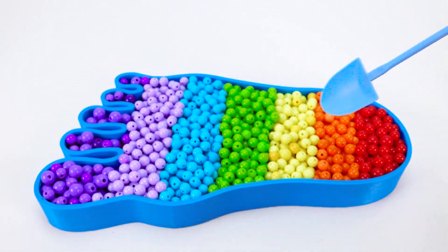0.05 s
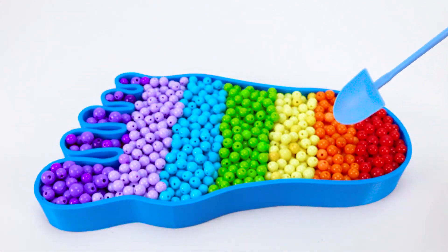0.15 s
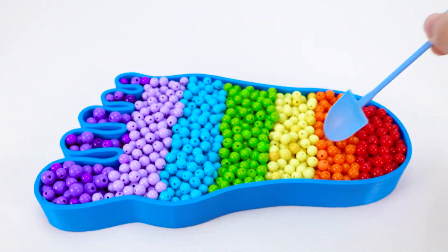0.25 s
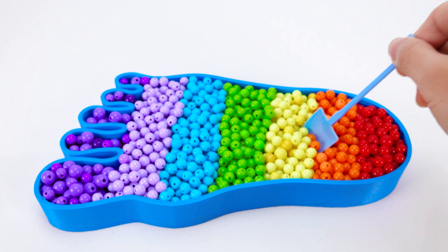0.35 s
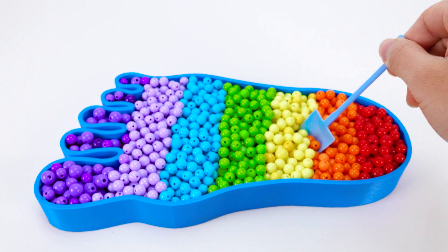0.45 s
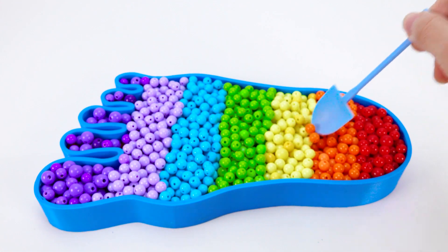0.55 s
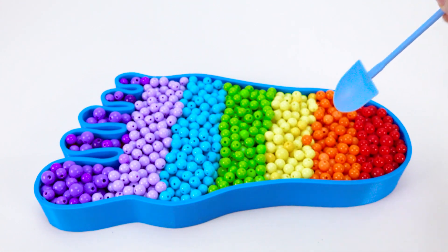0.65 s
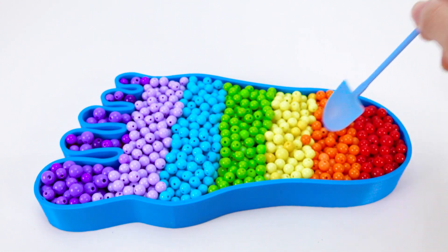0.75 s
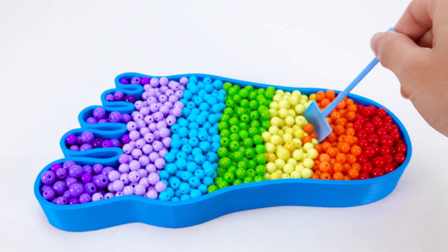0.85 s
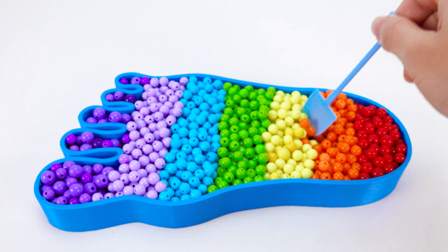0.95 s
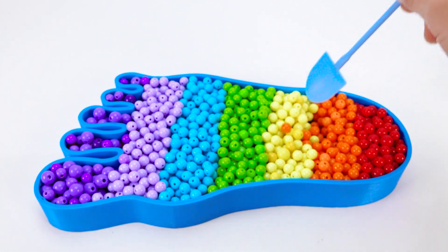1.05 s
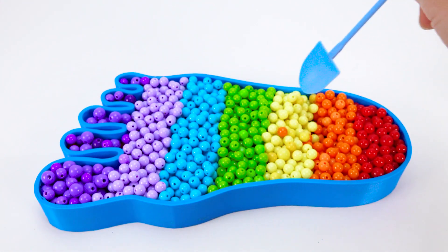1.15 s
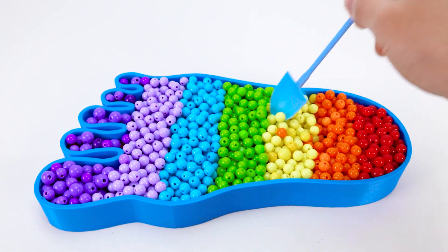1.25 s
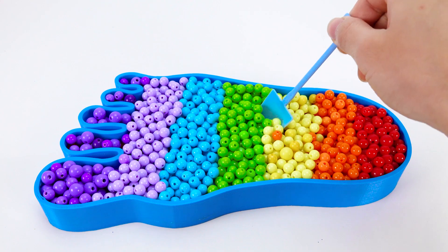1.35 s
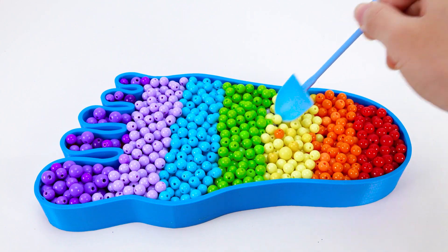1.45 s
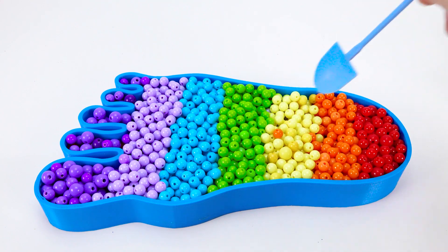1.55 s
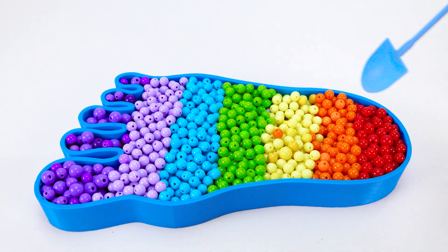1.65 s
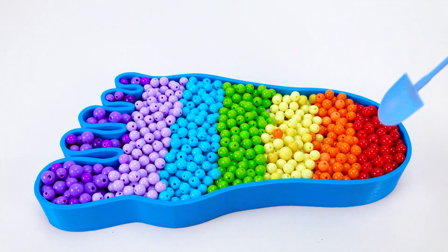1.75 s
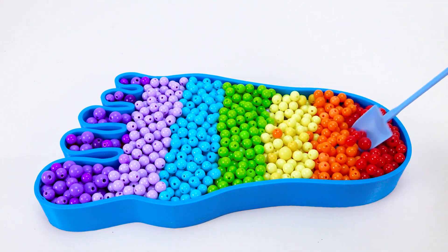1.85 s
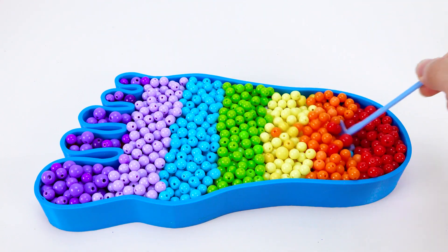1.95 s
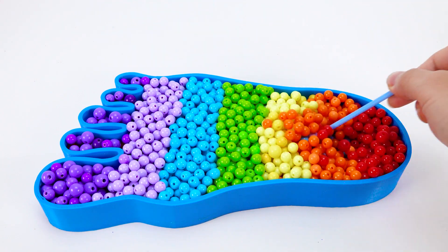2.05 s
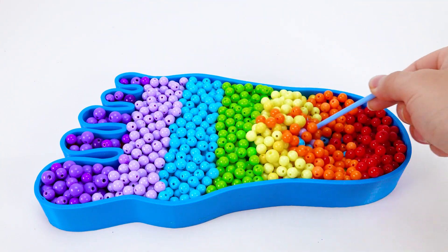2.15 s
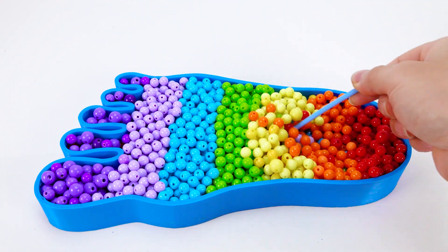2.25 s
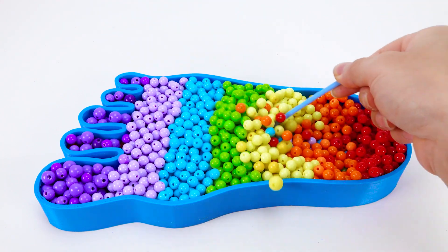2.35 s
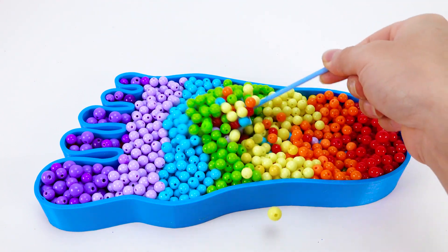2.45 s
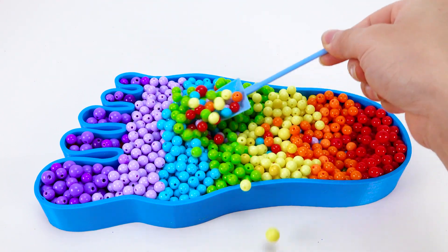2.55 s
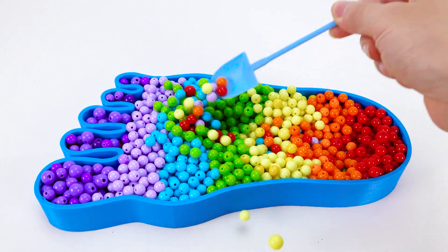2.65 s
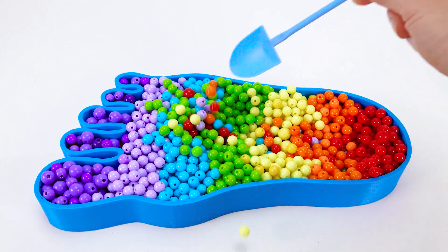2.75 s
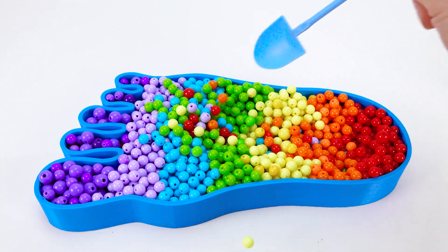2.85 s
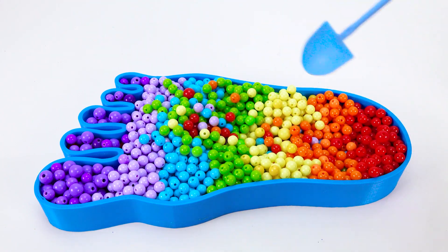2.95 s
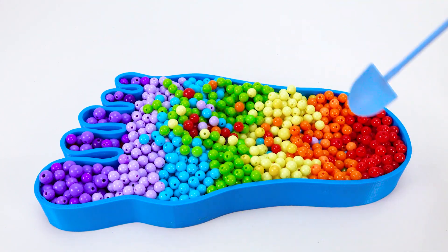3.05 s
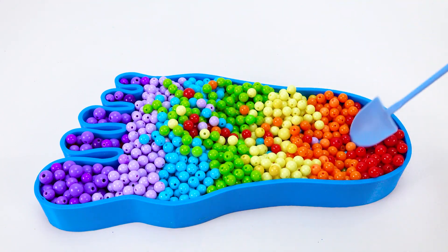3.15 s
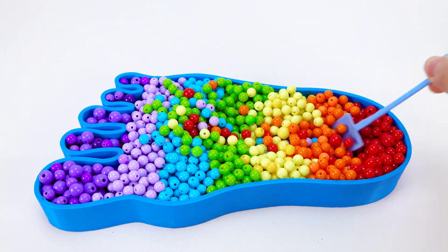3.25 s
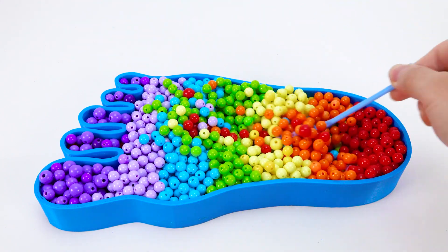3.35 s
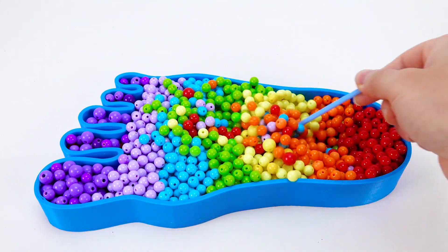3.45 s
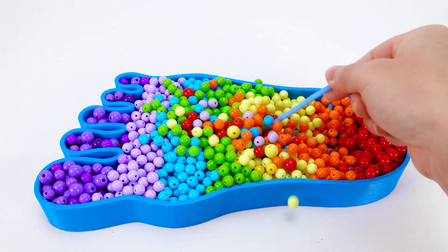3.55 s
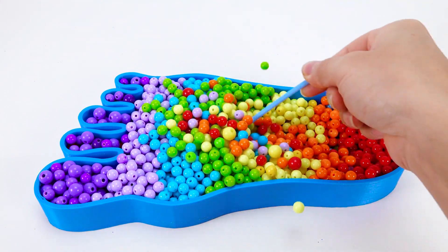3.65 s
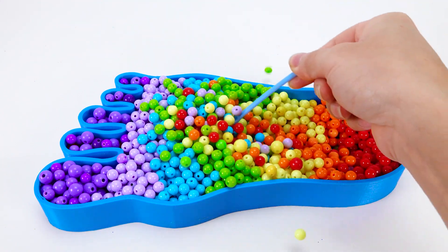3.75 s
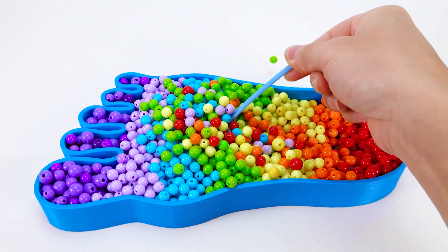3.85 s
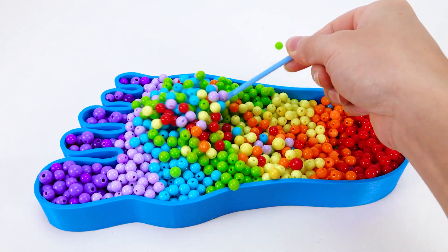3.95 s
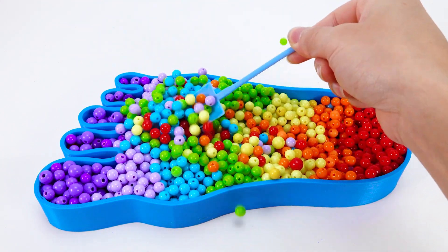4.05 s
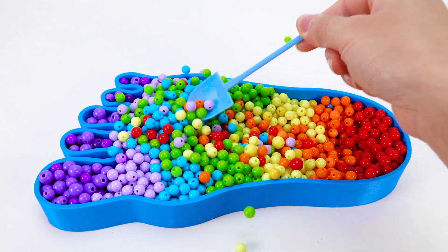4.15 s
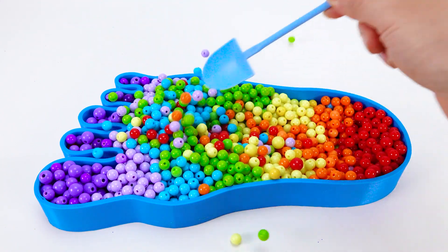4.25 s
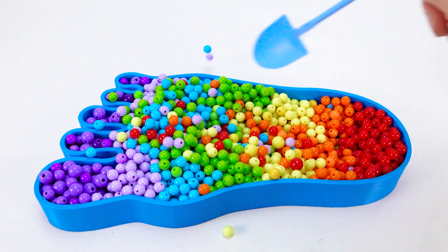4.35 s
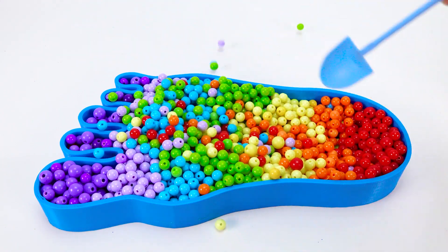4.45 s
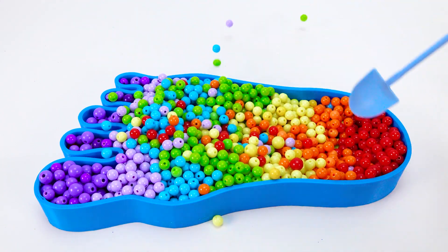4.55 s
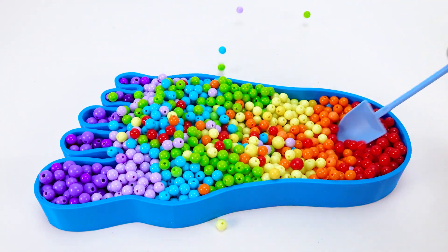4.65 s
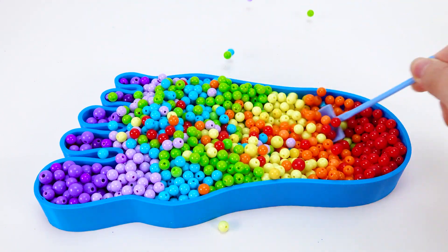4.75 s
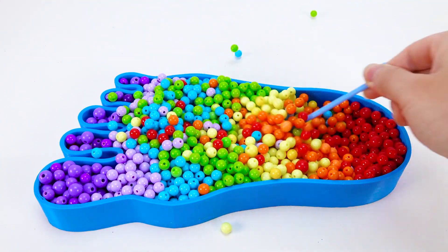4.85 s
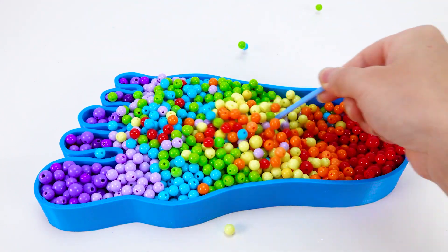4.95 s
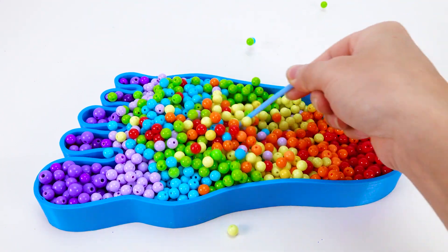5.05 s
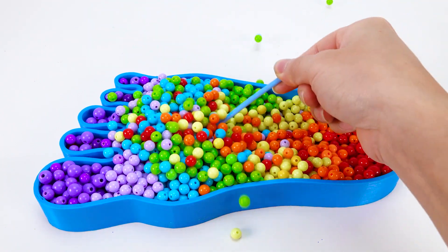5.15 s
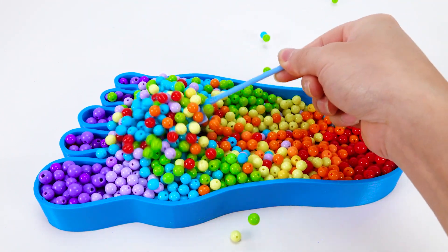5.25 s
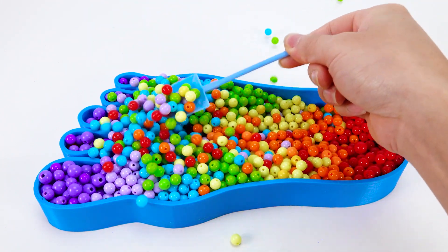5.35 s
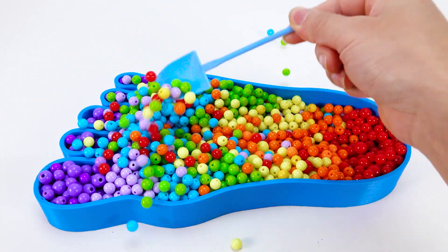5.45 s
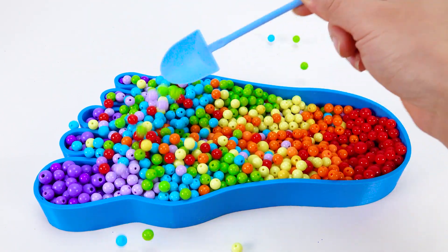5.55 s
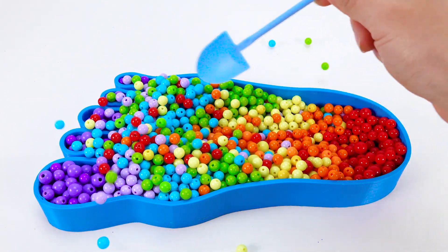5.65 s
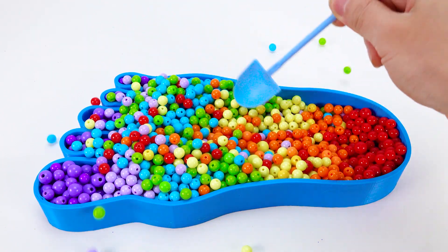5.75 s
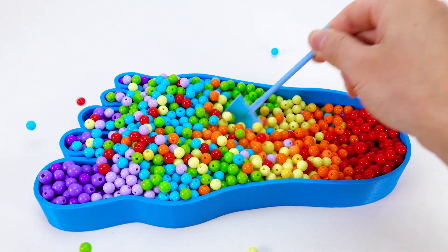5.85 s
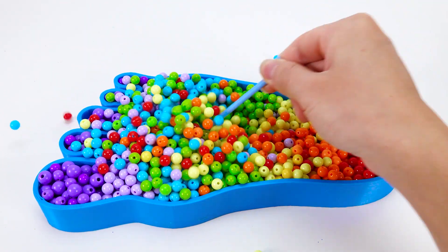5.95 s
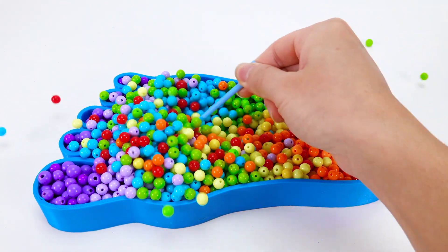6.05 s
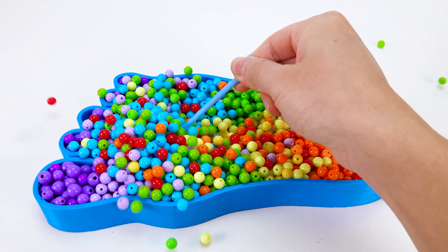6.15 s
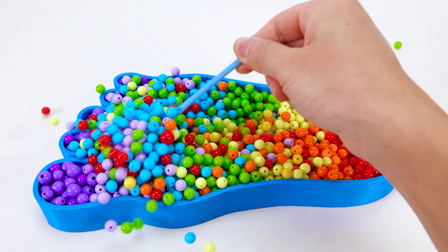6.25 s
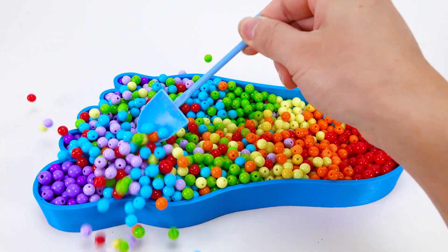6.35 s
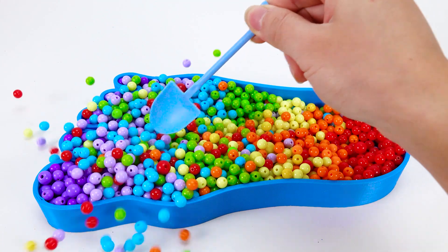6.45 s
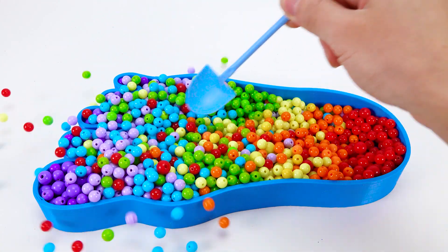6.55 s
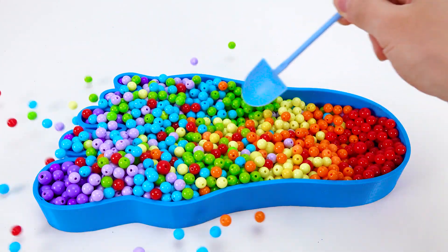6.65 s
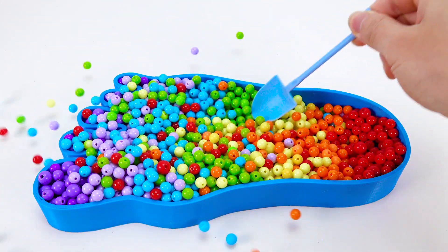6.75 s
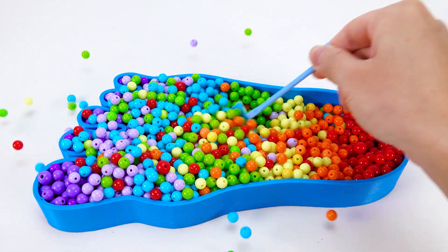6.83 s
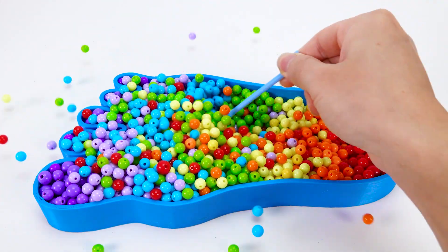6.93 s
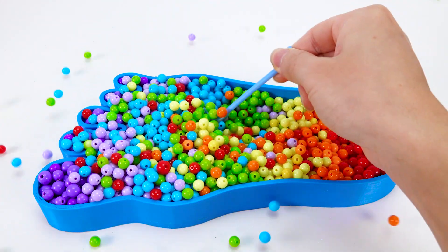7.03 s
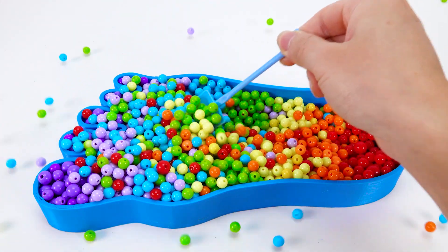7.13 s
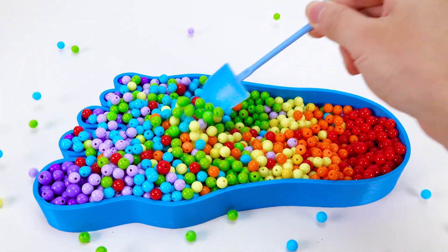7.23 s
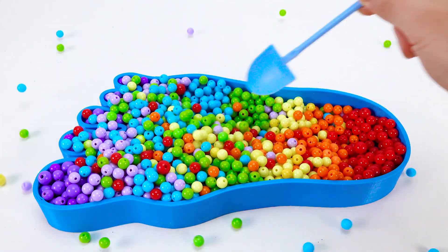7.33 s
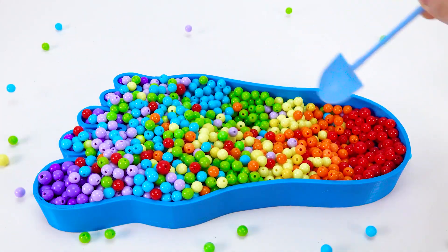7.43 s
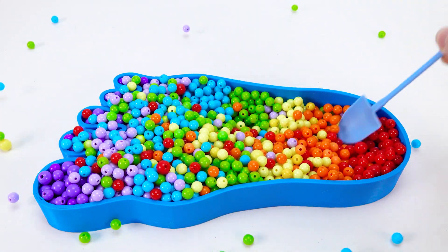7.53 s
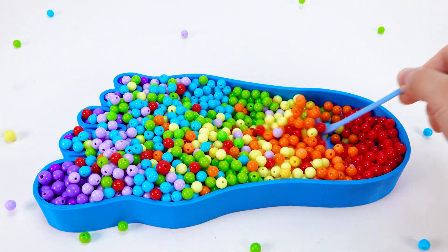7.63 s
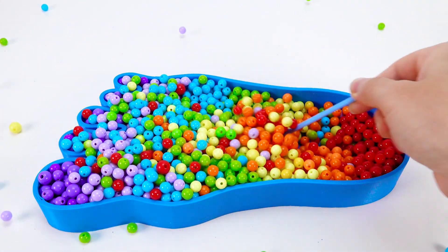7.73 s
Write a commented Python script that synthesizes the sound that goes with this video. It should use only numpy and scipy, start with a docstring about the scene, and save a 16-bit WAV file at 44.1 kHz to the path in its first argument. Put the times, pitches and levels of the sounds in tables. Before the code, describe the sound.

Small hard plastic beads rattle in a shallow plastic tray, heard in close stereo. Three quick, fairly soft scoops come first, then sweeping digs grow longer and stronger, with cascades of dense clicking and sharp clacks as beads fall from the blade. Loose beads ping and skip over the tabletop in between. Near the end the digs shorten again, with a slight room tail.

```python
"""Close stereo microphone over a plastic tray of small plastic beads on a table, in a small, quiet room.
First a plastic scoop makes three short dips: filtered random contacts among beads, with shoves and clacks.
Then mostly longer sweeps with gaps between: beads pour off the lifted scoop, swelling and fading contacts.
From the first long sweep on, some beads spill, skitter and bounce on the table: bright decaying rings.
Later the tray gives a few dull bumps, decaying sines; noise rumbles under the digs and a room tail follows."""
import sys
import numpy as np
from scipy import signal
from scipy.fft import rfft, irfft, next_fast_len
from scipy.io import wavfile
from scipy.ndimage import uniform_filter1d, map_coordinates

SR = 44100
rng = np.random.default_rng(int(sys.argv[2]) if len(sys.argv) > 2 else 0)


def transcribe(signal):
    """Save signal, clipped to [-1, 1], as a 16-bit WAV file at the path in sys.argv[1]."""
    frames = np.atleast_2d(signal).T
    limited = np.clip(frames, -1, 1)
    pcm = np.round(limited * 32767).astype(np.int16)
    wavfile.write(sys.argv[1], SR, pcm)


N = 343539

# All levels in the tables are relative: each source is trimmed once more where it is placed.
# Dying away of the room. Each row: frequency in Hz, time to fall 60 dB in seconds.
ROOM_DECAY = [(150, 0.79), (420, 0.85), (1000, 0.83), (4000, 0.5), (8000, 0.5), (15000, 0.27)]
# Stereo width before the microphone. Each row: frequency in Hz, gain of the side signal in dB.
SIDE_GAIN = [(60, 4), (110, -1), (200, 4.5), (380, -6.5), (700, -5), (1290, -7.5), (2380, -10),
             (4400, -7.5), (8120, -2), (15000, -0.5)]
# Rumble of the pushed tray. Each row: frequency in Hz, level in dB.
RUMBLE_COLOUR = [(15, -30), (30, 4), (50, 8), (95, -7), (125, 4), (170, 2), (300, -71)]
# Dull bumps of the tray. Each row: start in seconds, level in dB, pitch in Hz.
TRAY_BUMPS = [(4.795, -32, 620), (5.344, -25.5, 372.3), (5.39, -29.5, 632)]
# Long, low resonances of tray and table. Each row: frequency in Hz, width in Hz, level in dB.
HOLLOW_MODES = [(130.5, 23, -17), (167.4, 10.3, -4.5), (221.4, 17, -6), (249.8, 13, 4), (296, 18, -2),
                (375.3, 21.5, 12.5), (424.5, 17, 18.5), (500, 35, -13)]
# Short resonances of the filled tray. Each row: frequency in Hz, width in Hz, level over plain clatter in dB.
TRAY_MODES = [(840, 65, -17), (947, 25, -11), (1212, 22, -0.5), (1527, 83, -5), (2780, 67, -54),
              (4510, 75, -8.5), (5400, 180, -4), (5840, 57, 0.5)]
# Ring of loose beads on the table, a broad sheen last. Each row: frequency in Hz, width in Hz, level in dB.
RING_MODES = [(7036, 70, -7), (7553, 70, -9), (8021, 70, -7), (8576, 70, -5), (8786, 55, -2),
              (10271, 60, 3), (11127, 60, -5), (11827, 30, 3.5), (12400, 90, -9), (13469, 70, -14),
              (14800, 3000, -19)]
# Resonances of the scoop's blade. Each row: frequency in Hz, width in Hz, level in dB.
BLADE_MODES = [(2550, 86, -2), (2910, 61, 3.5), (3550, 180, -6.5), (4070, 92, -19)]
# Colour of a bead landing on the table. Each row: frequency in Hz, level in dB.
BOUNCE_COLOUR = [(150, -78), (250, -53), (918, -9.5), (1390, -9.5), (1660, 0.5), (2650, 0), (3940, 1.5),
                 (5680, 0.5), (6190, 0.5), (7110, -7), (7760, -0.5), (10200, -6), (15800, -15)]
# Colour of contacts in the heap. Each row: frequency in Hz, level in dB.
HEAP_COLOUR = [(280, -66), (480, -23.5), (556, -19), (680, -12.5), (940, -5), (1340, -11), (1570, -3),
               (1840, -2.5), (2810, 0), (3210, 0), (4490, 3), (5510, 1.5), (6770, -1.5), (10300, 5),
               (12100, -2), (15800, -13.5)]
# Single spilled beads bouncing. Each row: first landing in seconds, level in dB, first flight in seconds,
# ratio of each flight to the last, number of landings.
BOUNCING_BEADS = [(2.6635, -10.5, 0.1403, 0.942, 5), (2.8776, -15, 0.1403, 0.945, 3),
                  (3.9493, -13, 0.138, 0.94, 2), (4.263, -16, 0.1025, 0.94, 2),
                  (4.311, -14.5, 0.1109, 0.987, 3), (4.339, -14, 0.087, 0.94, 2),
                  (4.5514, -13, 0.095, 0.94, 2), (5.584, -11, 0.095, 0.895, 4),
                  (6.6742, -7.5, 0.11, 0.94, 2)]
# Beads thrown out of the tray skitter on the table. Each row: start in seconds, peak level in dB,
# fade in dB per second, ring in dB relative to the skitter.
SPILLED_BEADS = [(2.55, -37.5, 25, -17), (3.55, -39, 16, -14), (4.1, -38, 20, -7), (5.23, -32, 6, -8),
                 (6.38, -25.5, 6, -4.5), (6.94, -29, 15, -8.5)]
# Single beads snap against each other or the scoop. Each row: start in seconds, level in dB, pitch in Hz,
# sizzle in dB (10 dB is added before use, and the sum is capped at 0).
BEAD_CLACKS = [(0.6228, -15, 2230, -28), (0.7067, -10.5, 2660, -27), (0.741, -21, 3460, -19),
               (1.0956, -12.5, 2500, -28), (1.1992, -18, 2260, -31), (1.2126, -21, 3400, -25),
               (1.5116, -20, 4320, -22), (1.5505, -18, 4440, -18), (1.569, -23, 5400, -21),
               (2.8279, -7.5, 2640, -24), (3.0097, -26, 5460, -20), (3.8084, -4, 5330, -7),
               (4.087, -3, 4700, -11), (4.1865, -8, 2830, -18), (4.1994, -4, 2940, -24),
               (5.436, 1, 2800, -3), (5.4698, -18, 2892, -6), (5.5197, -1, 5700, -9), (5.54, -6, 2910, -18),
               (5.561, -12, 2940, -17), (5.6241, -4, 4180, -10), (5.646, -5.5, 2604, -19),
               (6.0644, 1, 4270, -28), (6.097, -2, 3998, -32), (6.121, -2, 3730, -25),
               (6.361, -4, 4070, -24), (6.565, -12, 3600, 5)]
# The scoop strikes or shoves the heap. Each row: start in seconds, level in dB.
SCOOP_SHOVES = [(0.3142, -19.5), (0.824, -26), (0.8539, -7.5), (1.2814, -7.5), (1.8347, -27), (1.8434, -22),
                (1.8556, -7), (1.8791, -3), (1.9215, -4), (3.1816, -6.5), (4.0871, -4), (4.6463, -3.5),
                (4.6957, -1), (4.7251, -1.5), (4.7621, -15), (4.8094, -3), (5.9694, 0.5), (6.8783, -4.5),
                (6.9054, -1.5), (7.628, -10)]
# Beads slide off the lifted scoop. Each row: start in seconds, rise in seconds, peak level in dB,
# fade in dB per second, end in seconds, then in dB relative to the stroke: tray body, sizzle, blade ring.
SCOOP_POURS = [(0.48, 0.17, -41, 67, 0.75, -19, -12, -32), (0.98, 0.08, -38.5, 16, 1.18, -17, -10.5, -27),
               (1.46, 0.068, -42, 8, 1.54, -18, -12, -24), (2.37, 0.12, -23, 27, 2.743, -18.5, -6.5, -26),
               (3.62, 0.071, -27, 12, 3.795, -15.5, -7, -20), (3.96, 0.05, -26, 9, 4.19, -20, -5.5, -12),
               (5.17, 0.09, -22, 22, 5.55, -18, -6, -2), (6.2, 0.19, -19, 65, 6.58, -19.5, -3.5, 0.5)]
# The scoop digs into the heap. Each row: start in seconds, rise in seconds, peak level in dB,
# fade in dB per second, end in seconds, then in dB relative to the stroke: tray body, sizzle,
# hollowness, rumble.
SCOOP_DIGS = [(0.311, 0.075, -26.5, 150, 0.66, -18, -6.5, 4, -90),
              (0.825, 0.039, -21.5, 143, 1.0, -18, -4, 4, -67),
              (1.279, 0.038, -22.5, 135, 1.52, -17, -6.5, 0.5, -58),
              (1.845, 0.15, -19.5, 18, 2.39, -20.5, -8.5, 5, -69),
              (3.178, 0.11, -18.5, 14, 3.66, -19.5, -6.5, 3.5, -82),
              (4.636, 0.14, -17, 9, 5.15, -19.5, -6, -0.5, -56.5),
              (5.84, 0.17, -15.5, 48, 6.3, -20.5, -4.5, -1.5, -44.5),
              (6.81, 0.098, -17, 84, 7.75, -17.5, -3.5, -3, -69),
              (7.565, 0.085, -16.5, 27.5, 7.72, -18.5, -6, 1.5, -44)]

STEP_S = 0.001  # time step of the level curves
START_DB = -17.0  # a stroke starts this far under its peak
SETTLE_DB_PER_S = 139  # extra fade once the scoop lets go and the heap comes to rest
SOFT_DULLS = 0.12  # dB of sizzle lost for each dB that a stroke is under its peak
HEAP_RING_DB = -22  # packed beads hardly ring: relative to their sizzle
SPILL_RISE_S = 0.2
SPILL_BODY_DB, SPILL_SIZZLE_DB = -13.5, -4.5  # relative to the clatter of the spill
BOUNCE_LOSS_DB, KNOCK_DB = 0.7, -14.5  # lost at each bounce; the knock relative to the ring
SHOVE_SIZZLE_DB = -10
SURGE_DB, SURGES_PER_S = 0.94, 30  # beads jam and give way at random
TOP_HZ, EDGE_HZ = 15800, 150  # the recorder's band limit and the softness of its edge


def amp(db):
    """Decibels to gain."""
    return 10 ** (np.asarray(db) / 20)


def unit(x):
    """Scale each channel to rms 1."""
    return x / np.sqrt(np.mean(x ** 2, axis=-1, keepdims=True) + 1e-20)


def along(points, hz):
    """Read a curve of (Hz, value) points on a log frequency axis."""
    f, v = np.transpose(points)
    return np.interp(np.log(hz + 1), np.log(f + 1), v)


def filtered(x, response):
    """Multiply the spectrum of x by a response of frequency."""
    n = x.shape[-1]
    m = next_fast_len(n + 8192)
    spectrum = rfft(x, m) * response(np.fft.rfftfreq(m, 1 / SR))
    return irfft(spectrum, m)[..., :n]


def coloured(x, points, size=4096):
    """Causal (minimum-phase) filter of the given (Hz, dB) shape, so that clicks keep their sharp front."""
    gain = amp(along(points, np.fft.rfftfreq(size, 1 / SR)))
    cepstrum = irfft(np.log(gain + 1e-6))
    cepstrum[1:size // 2] *= 2
    cepstrum[size // 2 + 1:] = 0
    impulse = irfft(np.exp(rfft(cepstrum)))
    return signal.fftconvolve(x, impulse[None], axes=1)[:, :x.shape[1]]


def resonances(modes, hz, order=1):
    """Summed response of (Hz, width, dB) modes; order 2 has steeper skirts."""
    return sum(amp(db) * (1j * hz * w / (c * c - hz * hz + 1j * hz * w)) ** order for c, w, db in modes)


def split(x, hz):
    """Causal crossover: the parts below and above hz."""
    sections = [signal.butter(4, hz, kind, fs=SR, output="sos") for kind in ("low", "high")]
    return [signal.sosfilt(np.vstack([s, s]), x) for s in sections]


def registers(x):
    """Split into body, clatter and sizzle at 1400 and 7000 Hz."""
    body, rest = split(x, 1400)
    clatter, sizzle = split(rest, 7000)
    return body, clatter, sizzle


def add(track, s, sound):
    """Lay a mid-side sound into a track at time s."""
    part = track[:, max(round(s * SR), 0):][:, :sound.shape[1]]
    part += sound[:, :part.shape[1]]


def strike(track, s, db, sound):
    """Return the track plus one hit whose first 5 ms have the given level in the mid."""
    out = track.copy()
    add(out, s, amp(db) * sound / np.std(sound[0, :SR // 200]))
    return out


def wobble(rate):
    """A smooth random curve, rate knots a second."""
    return map_coordinates(rng.standard_normal(size=1024), [np.arange(N) * rate / SR])


def per_sample(steps):
    """Join the steps of a control by straight lines."""
    return np.interp(np.arange(N) / SR, STEP_S * np.arange(len(steps)), steps)


def stroke(start, rise, peak_db, fade, end):
    """Level in dB of one movement: it swells, then fades, faster after its end as the beads settle."""
    t = np.arange(0, N / SR, STEP_S)
    swell = START_DB * np.clip(1 - (t - start) / rise, 0, 1) ** 2
    decay = fade * np.maximum(t - start - rise, 0) + SETTLE_DB_PER_S * np.maximum(t - end, 0)
    return np.where(t < start, -140, np.maximum(peak_db + swell - decay, -140))


def together(levels_db, offsets_db=0):
    """Summed power, in dB, of simultaneous movements, each with its own offset."""
    shifted_db = levels_db + np.reshape(offsets_db, (-1, 1))
    return 10 * np.log10(np.sum(np.exp(shifted_db * (np.log(10) / 10)), axis=0))


def click(t60, direct_db, ping_hz, ping_db, cycles=4, size=2048):
    """One contact in mid and side: a crack, a brief ring, and quick reflections among beads and walls."""
    t = np.arange(size) / SR
    reflections = unit(rng.standard_normal((2, size)) * amp(-60 * t / t60))
    crack = unit(1. * (t == 0))
    ping = unit(np.exp(-t * ping_hz / cycles) * np.sin(2 * np.pi * ping_hz * t))
    straight = amp(direct_db) * crack + amp(ping_db) * ping
    return unit(reflections + straight * [[1], [rng.choice([-1, 1])]])  # to a random side


def contacts(rate, spread_db, t60, direct_db, ping_db, cycles, count=90):
    """Random contacts of even mean power among many beads, each with its own pitch."""
    at = np.flatnonzero(rng.random(N) < rate / SR)
    strength = amp(spread_db * rng.random(len(at)) ** 2)  # many soft touches, a few hard ones
    power = uniform_filter1d(strength ** 2, size=11)
    strength /= np.sqrt(np.abs(power) * rate[at] + 1e-12)
    pitches = np.geomspace(1800, 12000, count)
    beads = [click(t60, direct_db, hz, ping_db, cycles) for hz in pitches]
    out = np.zeros((2, N))
    for i, a, k in zip(at, strength, rng.integers(count, size=len(at))):
        add(out, i / SR, a * beads[k])
    return unit(out)


def room(x):
    """The room's tail, different in mid and side, each frequency dying at its own speed."""
    hz, t, z = signal.stft(rng.standard_normal((2, SR * 3 // 4)), SR, nperseg=256)
    fade = amp(-60 * t / along(ROOM_DECAY, hz)[:, None])
    tail = signal.istft(z * fade, SR, nperseg=256)[1]
    tail = np.pad(tail / np.linalg.norm(tail[0]), ((0, 0), (round(.006 * SR), 0)))  # arrives 6 ms late
    return signal.fftconvolve(x[:1], tail, axes=1)[:, :N]


def tray():
    """Each dig pushes the tray, which rumbles faintly on the table; it also gives a few hollow bumps."""
    push_db = together(np.array([stroke(*row[:5]) + row[-1] for row in SCOOP_DIGS]))
    rumble = unit(coloured(rng.standard_normal((2, N)), RUMBLE_COLOUR))
    out = amp(per_sample(push_db)) * rumble
    t = np.arange(SR // 4) / SR
    envelope = amp(-60 * t / 0.13) * (1 - np.exp(-t / 0.0037))
    for s, db, hz in TRAY_BUMPS:
        ring = np.sin(2 * np.pi * hz * t) + amp(-1.0) * np.sin(2 * np.pi * 1.3 * hz * t)
        add(out, s, amp(db - 7.0) * ring * envelope * [[1], [.7]])
    return out


def landings():
    """(s, dB) of every landing: each flight is a little shorter and each landing a little softer."""
    hits = []
    for s, db, flight, shrink, count in BOUNCING_BEADS:
        for k in range(round(count)):
            flown = flight * sum(shrink ** j for j in range(k))
            hits.append((s + flown, db - BOUNCE_LOSS_DB * k))
    return hits


def drops():
    """A bead hits the table: a short knock and a soft thud of the board under a longer, bright ring."""
    out = np.zeros((2, N))
    for s, db in landings():
        blow = click(t60=0.046, direct_db=-20, ping_hz=1180, ping_db=-17.5)
        knock = registers(coloured(blow, BOUNCE_COLOUR))[0]
        padded = np.pad(blow, ((0, 0), (0, SR // 4)))  # room for the thud to die away
        thud = filtered(padded, lambda hz: resonances(HOLLOW_MODES, hz, order=2))
        bright = coloured(click(t60=0.08, direct_db=-17, ping_hz=4100, ping_db=-30.5), BOUNCE_COLOUR)
        bright = filtered(bright, lambda hz: 1 + resonances(RING_MODES, hz))
        bright = sum(registers(bright)[1:])
        out = strike(out, s, db - 12.5, unit(bright) + amp(KNOCK_DB) * unit(knock))
        add(out, s, amp(db - 48.0) * thud)
    return out


def clacks():
    """One hard contact: a crack and a few cycles at the pitch of the struck piece."""
    out = np.zeros((2, N))
    for s, db, hz, sizzle_db in BEAD_CLACKS:
        hit = click(t60=.013, direct_db=0, ping_hz=hz, ping_db=-2, cycles=3)
        body, mid, sizzle = registers(coloured(hit, HEAP_COLOUR))
        sound = amp(-4.5) * body + mid + sizzle * amp(min(sizzle_db + 10, 0))
        out = strike(out, s, db - 19.0, sound)
    return out


def shoves():
    """The blade sets a cluster of beads colliding at once: a brief crunch."""
    out = np.zeros((2, N))
    for s, db in SCOOP_SHOVES:
        crunch = click(t60=0.089, direct_db=-24.0, ping_hz=2500, ping_db=-12)
        body, mid, sizzle = registers(coloured(crunch, HEAP_COLOUR))
        out = strike(out, s, db - 18.0, body + mid + sizzle * amp(SHOVE_SIZZLE_DB))
    return out


def stirring():
    """Digs, pours and spills summed: dB of clatter, body, sizzle and ring; gains of hollowness and blade."""
    digs, pours = (np.array([stroke(*row[:5]) for row in table]) for table in (SCOOP_DIGS, SCOOP_POURS))
    spills = np.array([stroke(s, SPILL_RISE_S, db, fade, N / SR) for s, db, fade, _ in SPILLED_BEADS])
    strokes, loose = np.vstack([digs, pours]), together(spills)
    _, _, peak_db, _, _, body_db, sizzle_db = np.transpose([row[:7] for row in SCOOP_DIGS + SCOOP_POURS])
    level = together(np.vstack([strokes, loose]))
    body = together(np.vstack([strokes, loose]), np.r_[body_db, SPILL_BODY_DB])
    packed = together(strokes + SOFT_DULLS * (strokes - peak_db[:, None]), sizzle_db)
    sizzle = together(np.array([packed, loose + SPILL_SIZZLE_DB]))
    loose_ring = together(spills, [row[-1] for row in SPILLED_BEADS])
    ring = together(np.array([packed + HEAP_RING_DB, loose_ring]))
    hollow_db = together(digs, [row[7] for row in SCOOP_DIGS])
    hollowness = amp(hollow_db - level) - amp(together(digs) - level)  # mostly positive: a hollow boost near 2.4 kHz; digs with negative hollowness cut it instead
    pouring = amp(together(pours, [row[7] for row in SCOOP_POURS]) - level)
    return map(per_sample, (level, body, sizzle, ring, hollowness, pouring))


def heap():
    """Faster stirring makes more and stronger contacts; they drum on the tray, and loose beads ring."""
    level_db, body_db, sizzle_db, ring_db, hollowness, pouring = stirring()
    rate = np.clip(2000 * amp(.45 * (level_db + 24)), 700, 5000)  # contacts a second
    jostle = contacts(rate, spread_db=7, t60=.02, direct_db=-5, ping_db=-4, cycles=2.5)
    knocks = contacts(.15 * rate, spread_db=10, t60=.028, direct_db=-7, ping_db=-2, cycles=3.5)
    ticks = unit(jostle + amp(-6.0) * knocks) * amp(SURGE_DB * wobble(SURGES_PER_S))
    clatter = filtered(coloured(ticks, HEAP_COLOUR), lambda hz: 1 + resonances(TRAY_MODES, hz))
    deep = hollowness * filtered(clatter, lambda hz: resonances([(2410, 410, 0)], hz))
    blade = pouring * filtered(clatter, lambda hz: resonances(BLADE_MODES, hz))
    body, mid, sizzle = registers(clatter + deep + blade)
    ring = filtered(ticks, lambda hz: resonances(RING_MODES, hz))
    layers = [(body, body_db - .5), (mid, level_db - .5), (sizzle, sizzle_db - 3.0), (ring, ring_db)]
    rattle = sum(unit(x) * amp(db) for x, db in layers)
    # small beads radiate no bass; the low modes do, and keep sounding after the beads have settled
    hum = filtered(knocks * amp(body_db - 1.5), lambda hz: resonances(HOLLOW_MODES, hz, order=2))
    return hum + split(rattle, 377)[1]


def scene():
    """All sources near the microphone, plus the room; narrow in the middle register, wide in the treble."""
    near = tray() + drops() + clacks() + shoves() + heap()
    mid, side = near + amp(-11.5) * room(near)
    side = filtered(side, lambda hz: amp(along(SIDE_GAIN, hz)))
    return np.array([mid + side, mid - side]) * amp([[.15], [-.15]])  # first channel slightly louder


def record(dry):
    """The recorder rounds the very highest peaks and keeps nothing above its band limit."""
    rounded = dry / (1 + np.abs(dry / .9) ** 6) ** (1 / 6)
    return filtered(rounded, lambda hz: .5 - .5 * np.tanh((hz - TOP_HZ) / EDGE_HZ))


dry = scene()
out = record(dry)
transcribe(out)
```